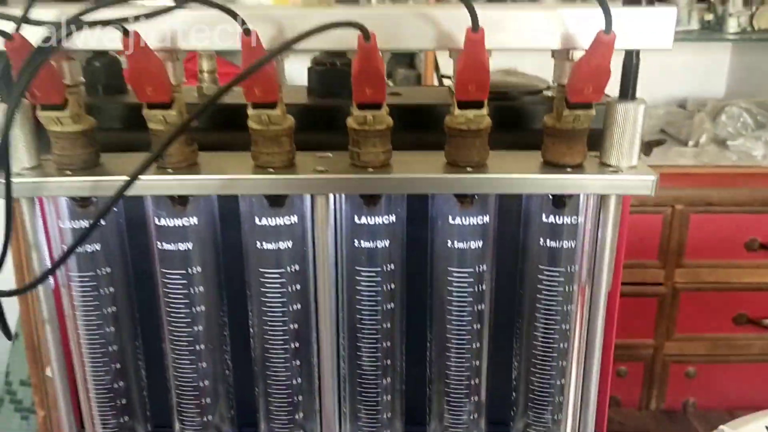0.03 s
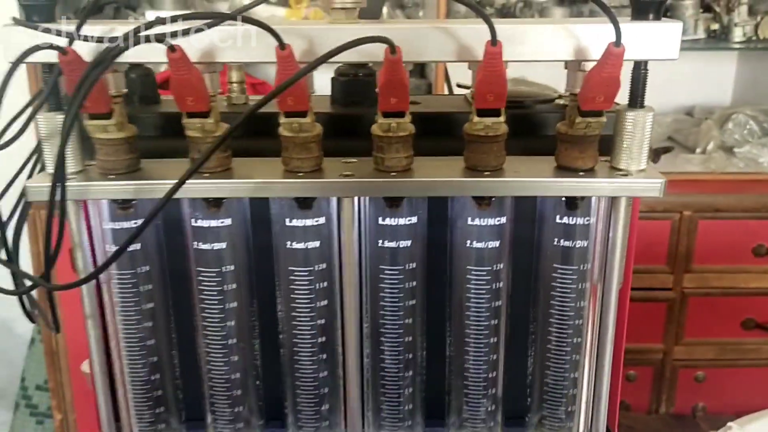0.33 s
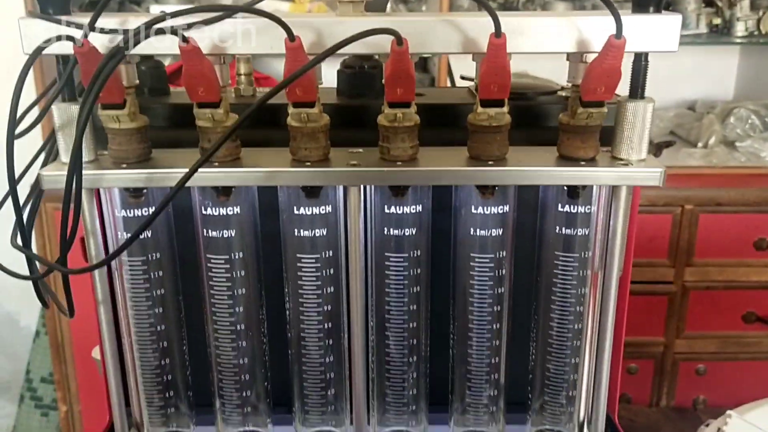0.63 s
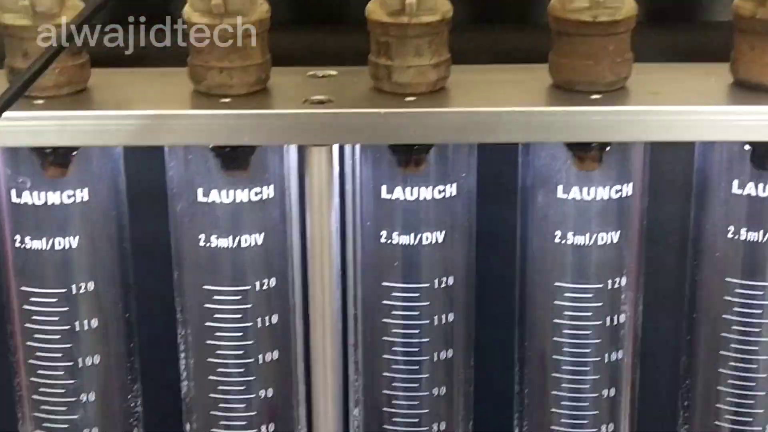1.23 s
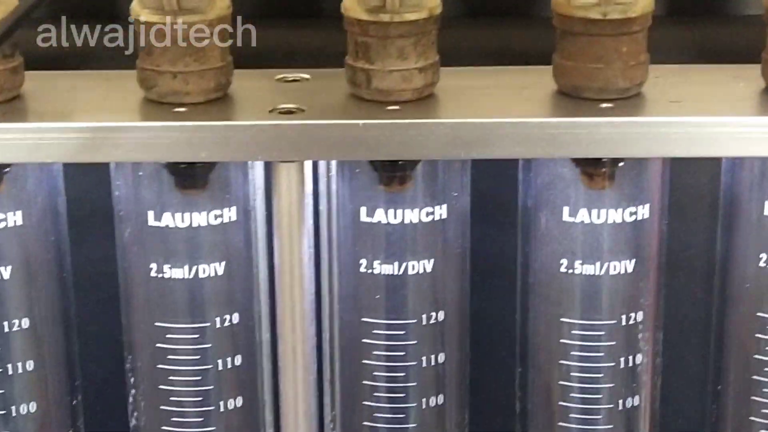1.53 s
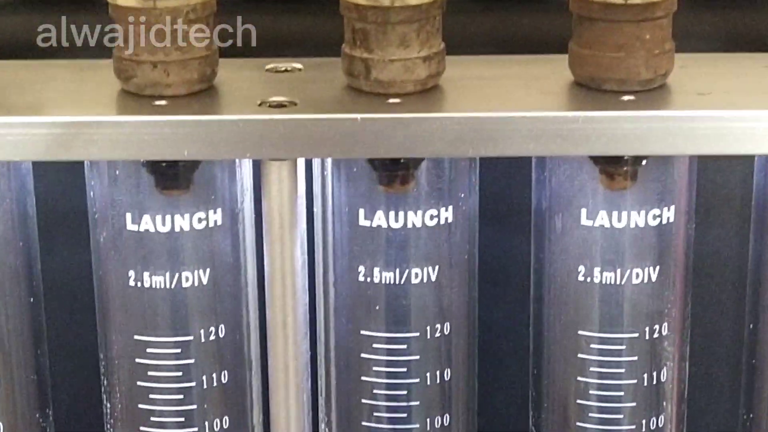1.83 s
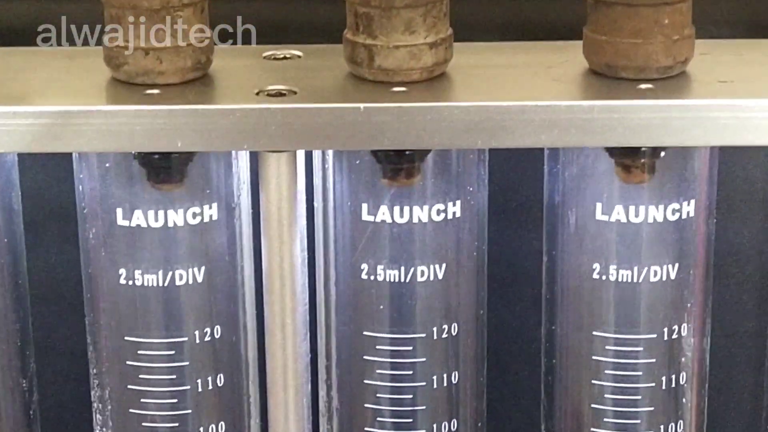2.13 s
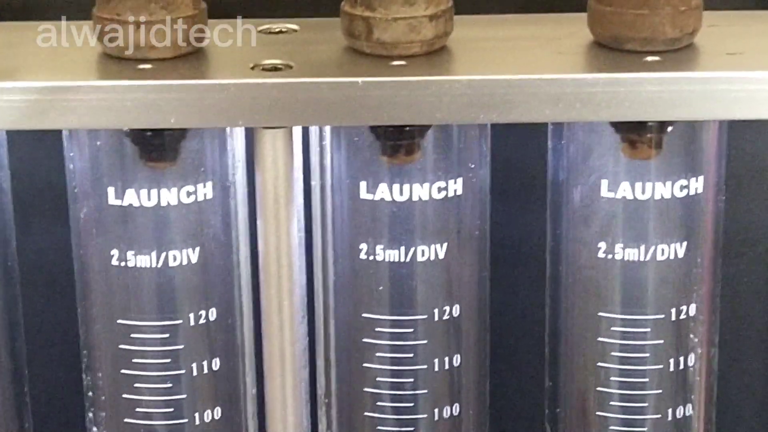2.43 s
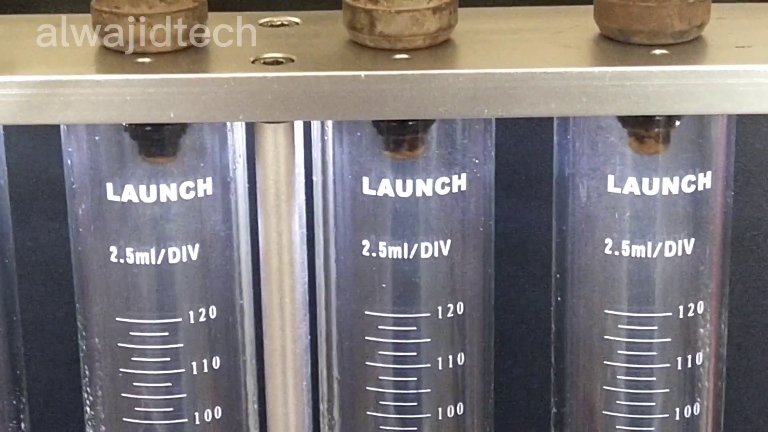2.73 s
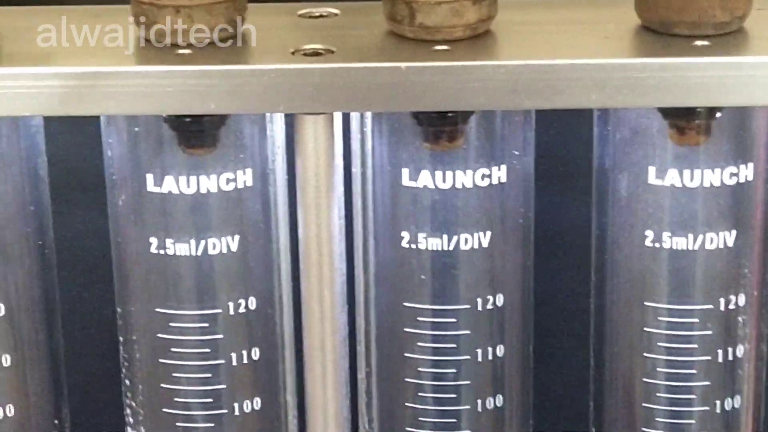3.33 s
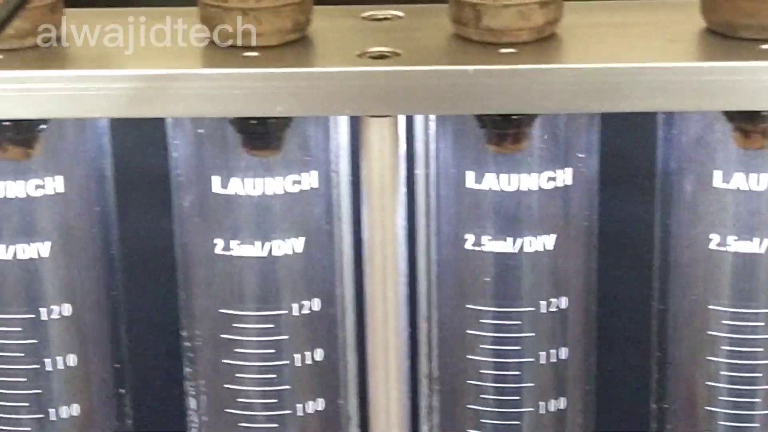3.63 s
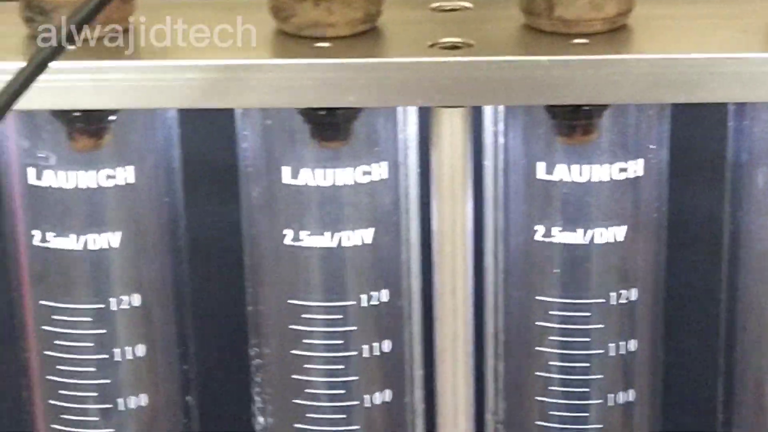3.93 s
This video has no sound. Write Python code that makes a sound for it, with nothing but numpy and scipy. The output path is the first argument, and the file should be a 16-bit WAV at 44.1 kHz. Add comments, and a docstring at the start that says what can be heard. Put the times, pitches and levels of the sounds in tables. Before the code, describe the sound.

Fuel injectors click sharply on a test bench, about five and a half times a second, over steady hiss and faint pump hum. The microphone is close, in a workshop, with nearly everything on the left.

```python
"""A test bench hums and hisses in a workshop, its pump and fan running steadily. Close to the microphone,
fuel injectors click in step, about five and a half times a second. Each click is two impacts, the needles
opening and snapping shut, that ring the rail, its tubes and the frame; the room answers with a short tail.
One faint knock comes near the end. Nearly all the sound is in the left channel."""
import sys
import numpy as np
from scipy import signal
from scipy.fft import rfft, irfft
from scipy.io import wavfile
from scipy.ndimage import uniform_filter1d

SR = 44100
rng = np.random.default_rng(int(sys.argv[2]) if len(sys.argv) > 2 else 0)


def persist_wave(psi):
    """Save psi, clipped to +-1, as 16-bit WAV."""
    counts = np.round(np.clip(psi, -1, 1) * 32767).astype(np.int16)
    wavfile.write(sys.argv[1], SR, np.atleast_2d(counts).T)


N = 176400

# hum of pump and fan (frequency [Hz], rms level [dB], unsteadiness [0-1])
HUM_TONES = [(50.4, -74.5, .3), (74.7, -66.5, 0.45), (101, -65, 0.4), (201.8, -60.5, 0.3), (357, -78, 0.46),
             (1334, -62.5, 0.22), (2098, -71.5, 0.2)]
# wavering of the strongest hum tone (time [s], rms level [dB])
DRONE_LEVELS = [(0, -52), (.12, -48.5), (.23, -55.5), (.33, -49), (.42, -57), (.52, -48), (.63, -62),
                (.71, -50), (.78, -56), (.92, -46), (.97, -55), (1.07, -49), (1.15, -61), (1.25, -52.5),
                (1.45, -46), (1.53, -63), (1.6, -52.5), (1.82, -45), (1.92, -55.5), (2.0, -48), (2.08, -61),
                (2.16, -49), (2.25, -60), (2.35, -49), (2.44, -56), (2.54, -50), (2.93, -50.5), (3.15, -52),
                (3.63, -49.5), (3.9, -56.5), (4, -53)]
# steady rush of the machine (frequency [Hz], relative level [dB])
RUSH_COLOUR = [(25, -39), (45, -25), (75, -8.5), (110, -0.5), (170, 0.5), (300, -6.5), (550, -7.5),
               (900, -11), (1250, -10), (1500, -14), (2200, -8.5), (3000, -11.5), (3600, -7), (4300, -13.5),
               (5100, -13.5), (5800, -24.5), (7800, -28.5), (9200, -26), (15000, -26)]
# swells of the hiss (time [s], level [dB], centre [Hz], width [Hz], rise [s], fall [s])
HISS_SWELLS = [(.35, -42, 2900, 1690, .04, .18), (2.18, -46, 3350, 2800, 0.1, 0.14),
               (3.84, -42.5, 3360, 905, 0.091, 0.075)]
# the clicks as the microphone moves along the bench (time [s], relative level [dB])
MIC_NEARNESS = [(0, 1), (.6, 1.6), (1.3, 0.7), (2.4, 0.96), (3.4, 1.9), (4, 0)]
# modes of rail and tubes (frequency [Hz], relative level [dB], t60 [s])
RAIL_MODES = [(1182, -15, 0.055), (1883, -2, 0.033), (2750, -14, 0.031), (3506, -4.5, 0.05),
              (3594, 3.5, 0.03), (3830, -7, 0.018), (4157, -2, 0.016), (4382, 2.5, 0.026), (4520, 0, .022),
              (4785, -5, 0.032), (4752, -1, 0.037), (5151, -3.5, 0.035), (6394, -15, 0.053),
              (10755, -8, 0.024)]
# impact of the needles opening (frequency [Hz], relative level [dB])
OPEN_COLOUR = [(300, -28), (1200, -6), (3000, -13), (3700, -4), (4400, 7.5), (5100, 2), (5900, -13),
               (8500, -17.5), (10000, 2), (11600, -12), (12900, 6), (13700, -3.5), (15000, 5), (16000, -17)]
# impact of the needles shutting (frequency [Hz], relative level [dB])
SHUT_COLOUR = [(300, -12), (700, -3.5), (1300, -14), (2900, -10.5), (3700, -6), (4700, -3), (5900, -10.5),
               (7400, -3.5), (10300, 1), (11600, 0.5), (12500, 0.5), (14500, -2.5), (16000, -6)]
# dense ringing of the frame (frequency [Hz], relative level [dB])
FRAME_COLOUR = [(400, -18), (1500, -10.5), (3100, -12.5), (3600, 3), (4600, 4), (5300, -8), (5900, -15),
                (8000, -11), (10200, -11), (15000, -24.5)]
# the needles bounce on their seats (time after shutting [s], level [dB])
NEEDLE_BOUNCES = [(.0014, -16.5), (.0026, -18), (.0065, -23.5)]
# impact of one bounce (frequency [Hz], relative level [dB])
BOUNCE_COLOUR = [(300, -6), (700, -7.5), (1500, -10), (2800, 0), (3600, 3), (4600, 0), (5400, 4.5),
                 (6000, -9.5), (8000, -19), (10300, -7), (15000, -11.5)]
# reverberation of the workshop (frequency [Hz], relative level [dB])
ROOM_COLOUR = [(300, 8), (520, -3), (1200, -9), (2400, 4.5), (3700, -6), (5000, -3.5), (5900, -3),
               (8000, -8), (10000, -4.5), (15000, -16.5)]
# noise floor of the right channel (frequency [Hz], relative level [dB])
FLOOR_COLOUR = [(30, -15), (90, -0.5), (250, -4), (1000, -11), (3000, -14.5), (7000, -19.5), (13500, -19.5),
                (15000, -13)]

FIRST_CLICK_S, PERIOD_S, NEEDLE_LIFT_S = .12437, .184177, .00315
OPEN_DB, SHUT_DB, RAIL_DB, FRAME_DB = -10.5, -12.5, -26.5, -13.5
OPEN_T60_S, SHUT_T60_S, FRAME_T60_S, BOUNCE_T60_S = .0079, .008, .05, .0085
RAIL_RISE_S, CONTACT_SCATTER = .0066, .28


def undb(db):
    """Decibels to gain."""
    return 10 ** (np.asarray(db) / 20)


def unit(x):
    """Scale to rms 1."""
    return x / np.sqrt(np.mean(x ** 2))


def colour(x, points, size=4096):
    """Causal filter through (frequency [Hz], level [dB]) points that keeps the power of white noise."""
    hz, db = np.array(points, float).T
    bin_hz = np.arange(size // 2 + 1) * SR / size
    gain = unit(undb(np.interp(np.log(bin_hz + 1), np.log(hz), db)))
    cepstrum = irfft(np.log(gain))
    cepstrum[1:size // 2] *= 2  # fold onto positive time for minimum phase
    cepstrum[size // 2 + 1:] = 0
    return signal.oaconvolve(x, irfft(np.exp(rfft(cepstrum))))[:len(x)]


def fade(t60, size):
    """Exponential decay, 60 dB down after t60 seconds."""
    return np.exp(-np.log(1000) * np.arange(size) / SR / t60)


def burst(t60, size):
    """Dying noise of energy 1 with an even spectrum."""
    x, decay = rng.standard_normal(size), fade(t60, size)
    for _ in range(6):  # even out spectrum and envelope in turn
        x = irfft(np.exp(1j * np.angle(rfft(x * decay))), size)
        x = x / np.sqrt(np.abs(uniform_filter1d(x ** 2, size=31)) + 1e-18)
    return x * decay / np.linalg.norm(x * decay)


def walk(rate):
    """Smooth random motion of rms 1, taking rate steps a second."""
    hold = int(SR / rate)
    steps = np.repeat(rng.standard_normal(N // hold + 2), hold)
    smooth = uniform_filter1d(uniform_filter1d(steps, hold), hold)
    return unit(smooth[rng.integers(hold):][:N])


def add(out, x, start_s):
    """Mix x into out from the given time."""
    i = min(max(int(round(start_s * SR)), 0), len(out))
    out[i:i + len(x)] += x[:len(out) - i]


def motor_tone(hz, unsteady, wavers_per_s=16):
    """A tone of rms 1 that wavers in level and phase."""
    phase = 2 * np.pi * (hz * np.arange(N) / SR + rng.random())
    along, across = (unsteady * walk(wavers_per_s) / np.sqrt(2) for _ in range(2))
    return unit((1 + along) * np.cos(phase) + across * np.sin(phase))


def hum():
    """Pump and fan: steady motor tones under one stronger, wavering drone."""
    drone_db = np.interp(np.arange(N) / SR, *np.array(DRONE_LEVELS).T)
    drone = undb(drone_db) * motor_tone(hz=483.5, unsteady=.14)
    return drone + sum(undb(db) * motor_tone(hz, unsteady) for hz, db, unsteady in HUM_TONES)


def hiss(rush_db=-48, waver_db=1.06):
    """Steady rush of the running machine, with a few brief swells."""
    t = np.arange(N) / SR
    rush = unit(colour(rng.standard_normal(N), RUSH_COLOUR))
    out = undb(rush_db + waver_db * walk(rate=5.95)) * rush
    for at, db, hz, width_hz, rise, fall in HISS_SWELLS:
        band = signal.lfilter(*signal.iirpeak(hz, hz / width_hz, fs=SR), rng.standard_normal(N))
        band = unit(colour(band, [(5000, 3), (6000, -5.5)]))  # soften the treble
        swell = np.exp(-np.maximum((at - t) / rise, (t - at) / fall))
        out += undb(db) * band * swell
    return out


def injectors(size=4096):
    """Close up, the needles open, snap shut and bounce at a fixed rate, ringing rail and frame."""
    t, out = np.arange(size) / SR, np.zeros(N)
    starts = np.arange(FIRST_CLICK_S, N / SR, PERIOD_S)
    mic_gains = undb(np.interp(starts, *np.array(MIC_NEARNESS).T))
    rail = sum(undb(db) * np.sin(2 * np.pi * (hz * t + rng.random())) * fade(t60, size)
               for hz, db, t60 in RAIL_MODES)
    rail *= undb(RAIL_DB) * (1 - np.exp(-t / RAIL_RISE_S))
    for start, gain in zip(starts, mic_gains):
        add(out, gain * rail, start)
    parts = [(0, OPEN_DB, OPEN_T60_S, OPEN_COLOUR),
             (NEEDLE_LIFT_S, SHUT_DB, SHUT_T60_S, SHUT_COLOUR),
             (NEEDLE_LIFT_S, FRAME_DB, FRAME_T60_S, FRAME_COLOUR)]
    parts += [(NEEDLE_LIFT_S + after, db, BOUNCE_T60_S, BOUNCE_COLOUR) for after, db in NEEDLE_BOUNCES]
    for lag, db, t60, points in parts:
        strike, decay, impacts = burst(t60, size), fade(t60, size), np.zeros(N)
        for start, gain in zip(starts, mic_gains):
            # the same strike every time, plus a little fresh contact noise
            contact = CONTACT_SCATTER * rng.standard_normal(size) * decay / np.linalg.norm(decay)
            add(impacts, gain * (strike + contact), start + lag)
        out += undb(db) * colour(impacts, points)
    return out


def workshop(direct, db=-13.5, t60=.4):
    """The room's diffuse tail, reaching the microphone behind the direct sound."""
    tail = rng.standard_normal(SR) * fade(t60, SR)
    tail = colour(tail / np.linalg.norm(tail), ROOM_COLOUR)
    return undb(db) * signal.fftconvolve(direct, tail)[:N]


def knock(hz=1150, db=-34.5, t60=.0068):
    """One soft, dull tap: a single mode that dies at once."""
    t, out = np.arange(SR) / SR, np.zeros(N)
    tap = np.sin(2 * np.pi * hz * t) * fade(t60, SR)
    add(out, undb(db) * tap, start_s=3.4865)
    return out


def scene(leak_db=-53, floor_db=-72.5):
    """The bench on the left channel; on the right, only a trace of it and a faint noise floor."""
    direct = injectors() + knock()
    left = hum() + hiss() + direct + workshop(direct)
    noise_floor = unit(colour(rng.standard_normal(N), FLOOR_COLOUR))
    right = undb(leak_db) * left + undb(floor_db) * noise_floor
    return np.array([left, right])


def record(dry, top_hz=15800):
    """The recorder cuts the top of the treble steeply."""
    return signal.sosfilt(signal.ellip(10, .2, 70, top_hz, fs=SR, output="sos"), dry)


dry = scene()
out = record(dry)
persist_wave(out)
```